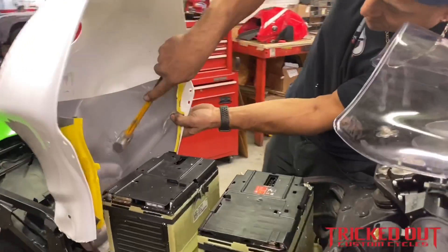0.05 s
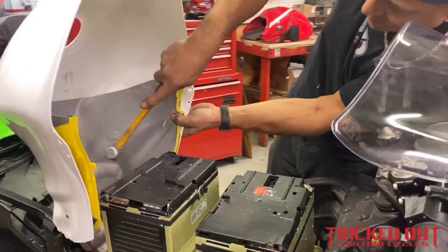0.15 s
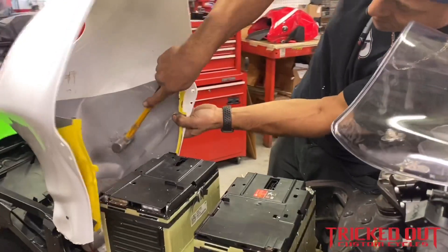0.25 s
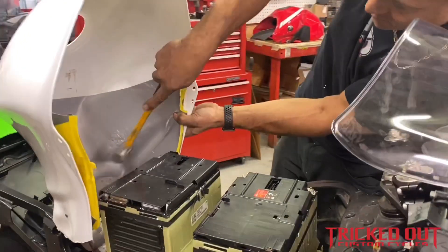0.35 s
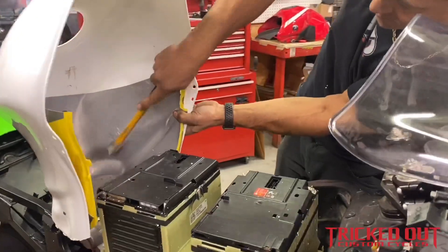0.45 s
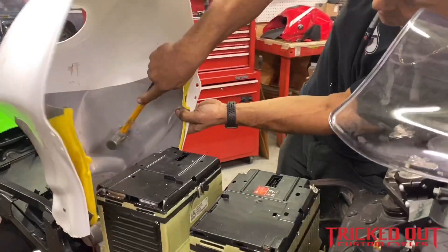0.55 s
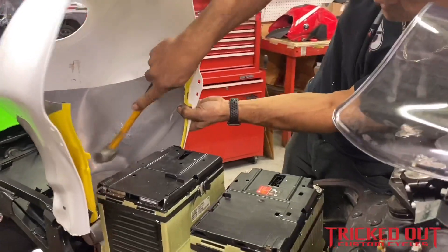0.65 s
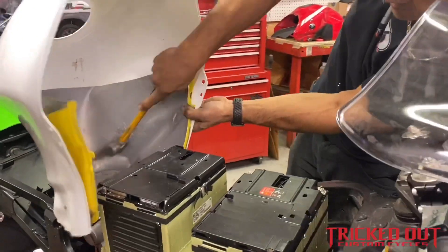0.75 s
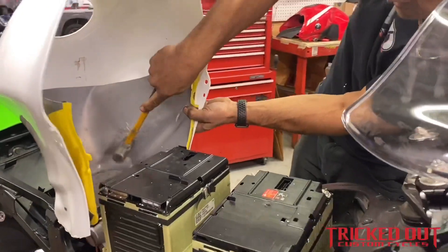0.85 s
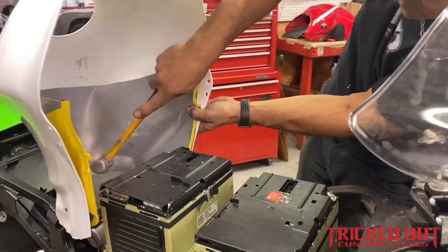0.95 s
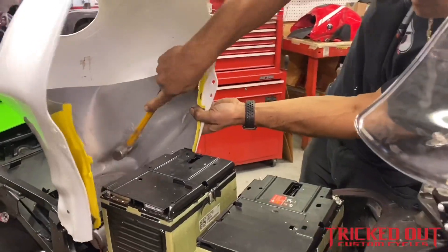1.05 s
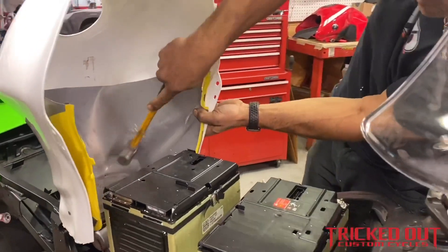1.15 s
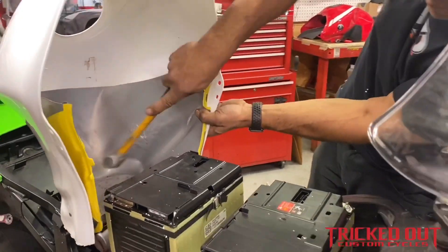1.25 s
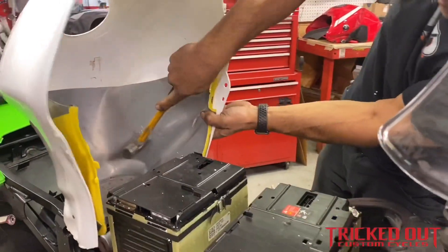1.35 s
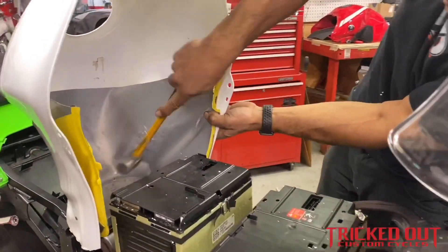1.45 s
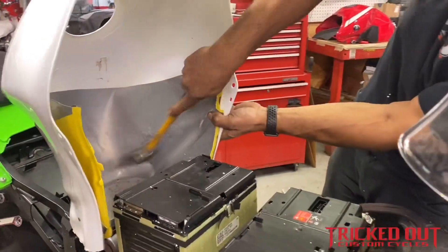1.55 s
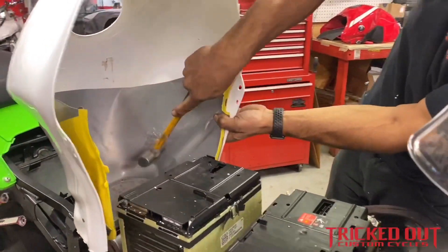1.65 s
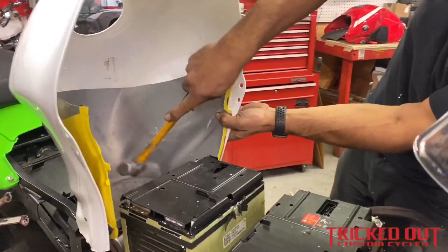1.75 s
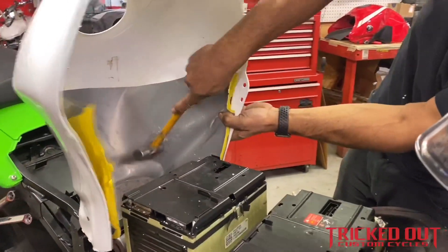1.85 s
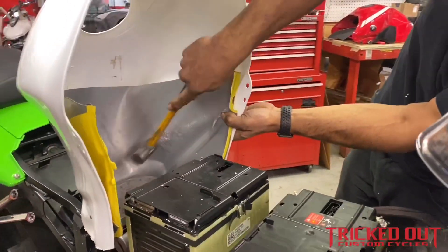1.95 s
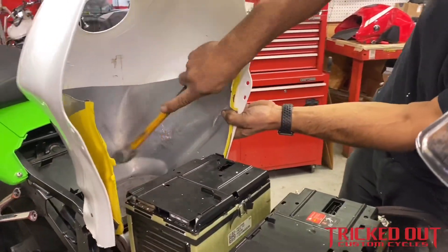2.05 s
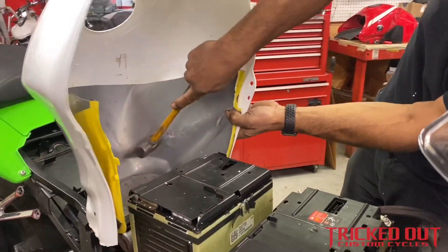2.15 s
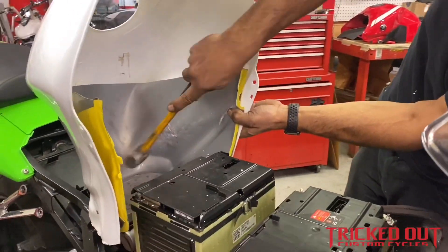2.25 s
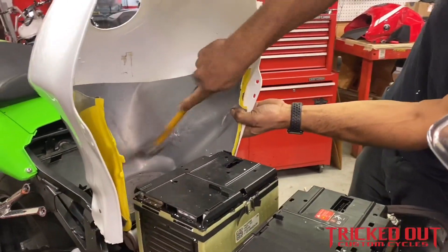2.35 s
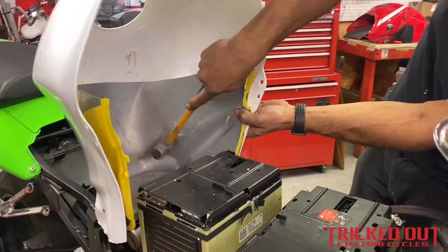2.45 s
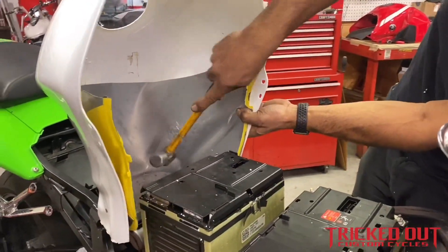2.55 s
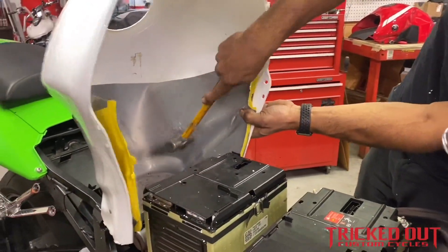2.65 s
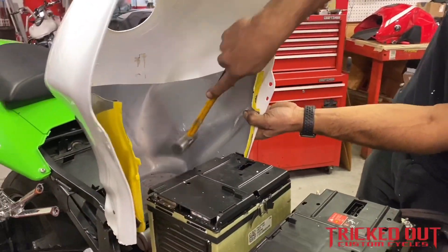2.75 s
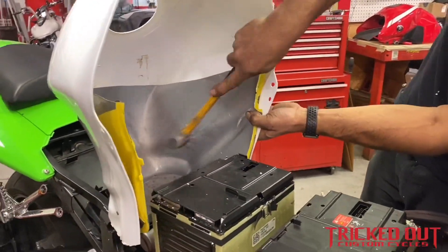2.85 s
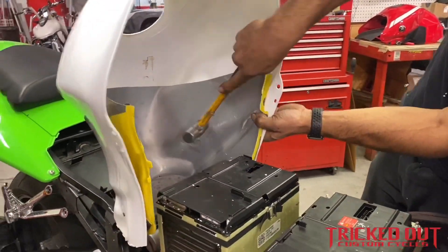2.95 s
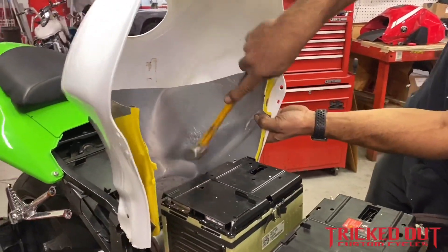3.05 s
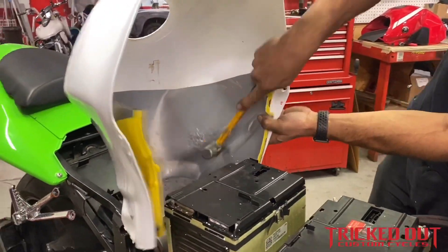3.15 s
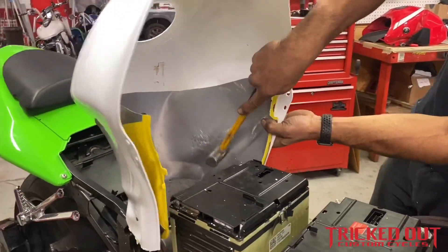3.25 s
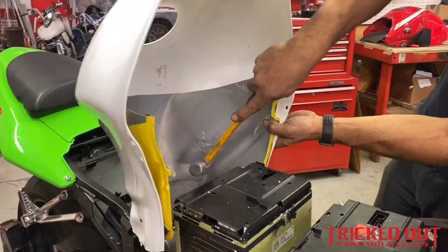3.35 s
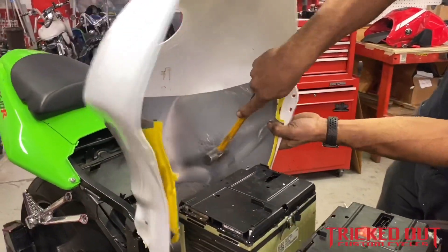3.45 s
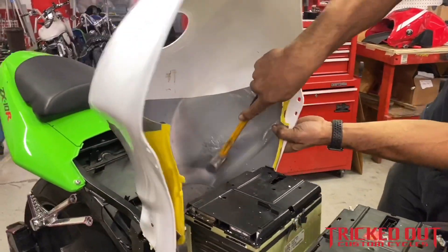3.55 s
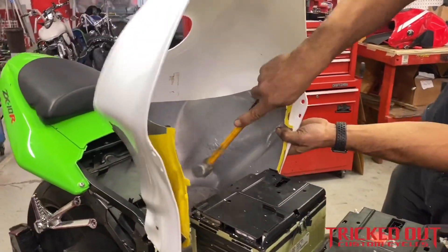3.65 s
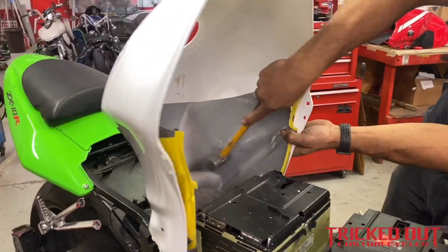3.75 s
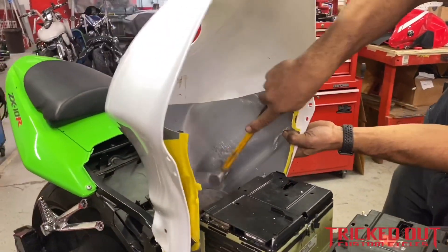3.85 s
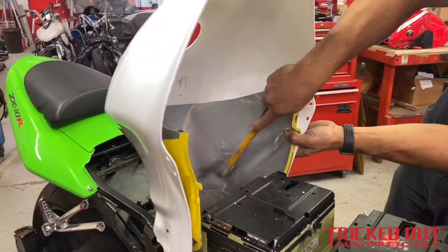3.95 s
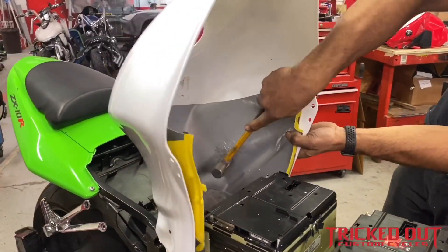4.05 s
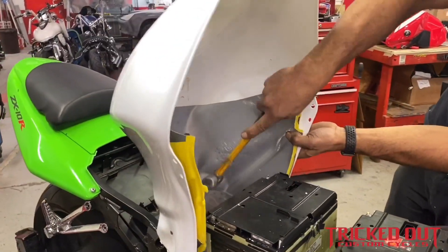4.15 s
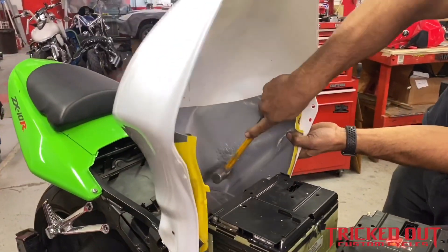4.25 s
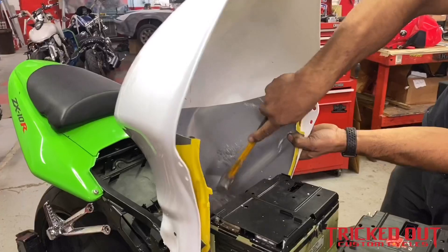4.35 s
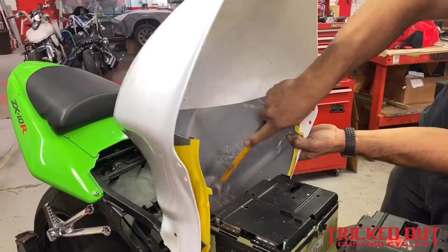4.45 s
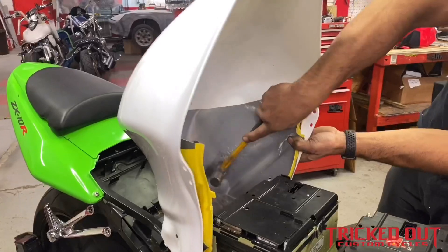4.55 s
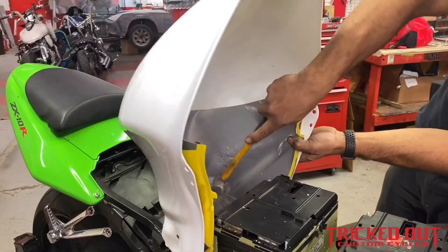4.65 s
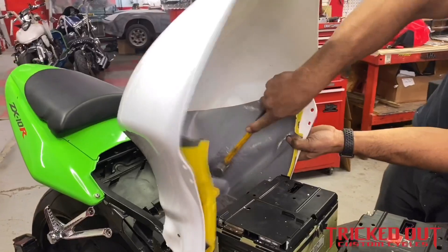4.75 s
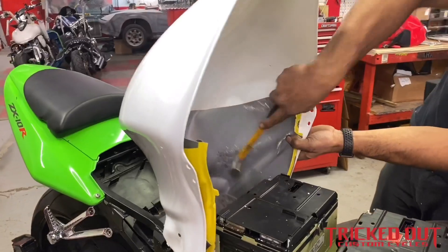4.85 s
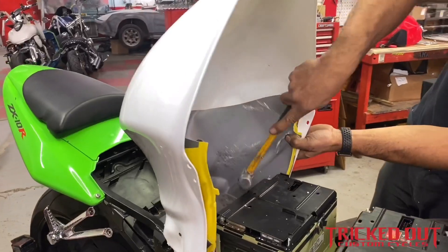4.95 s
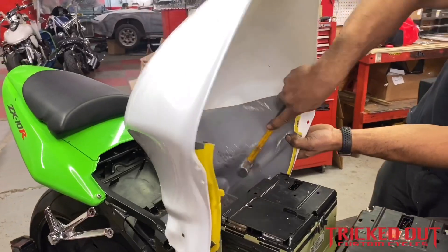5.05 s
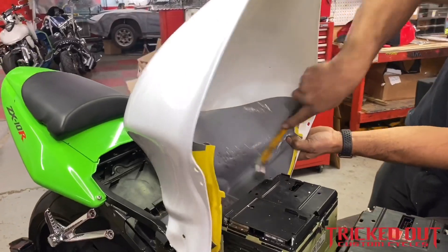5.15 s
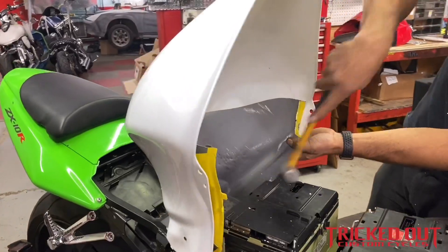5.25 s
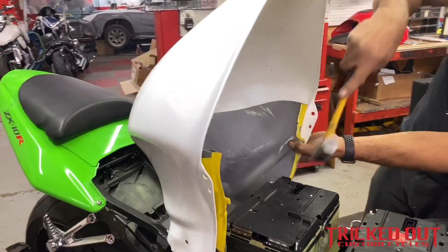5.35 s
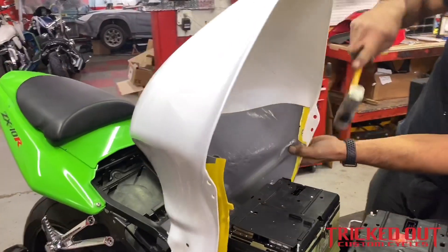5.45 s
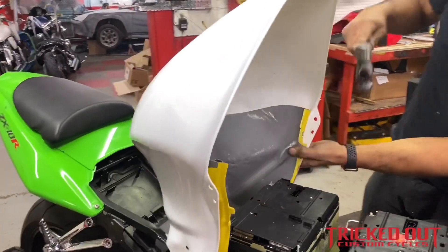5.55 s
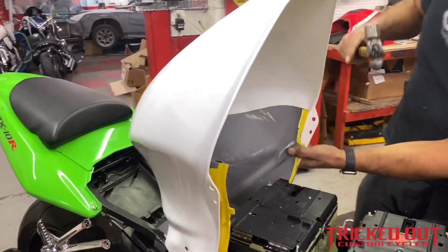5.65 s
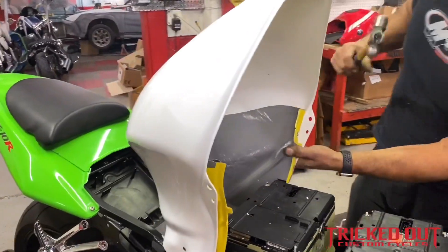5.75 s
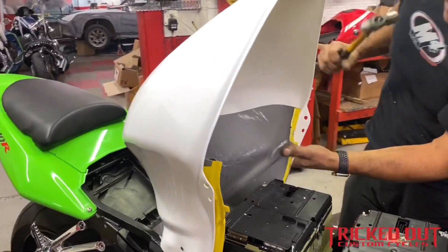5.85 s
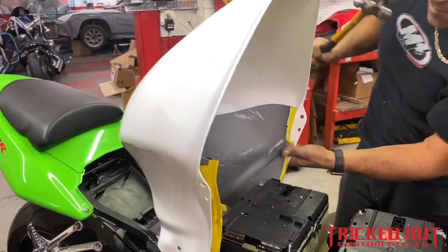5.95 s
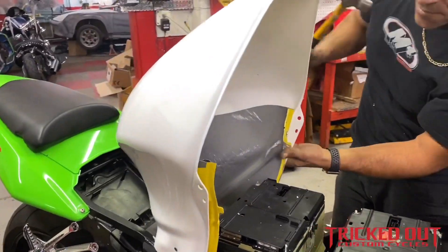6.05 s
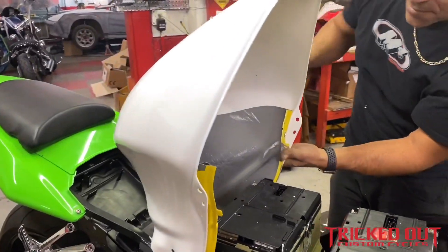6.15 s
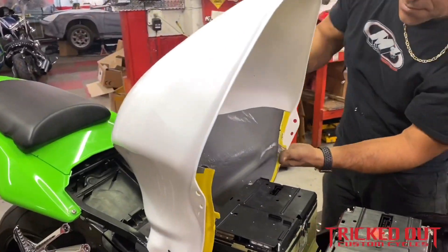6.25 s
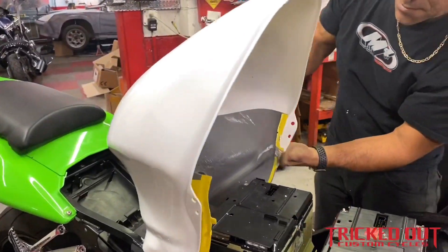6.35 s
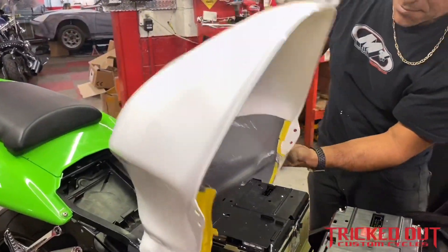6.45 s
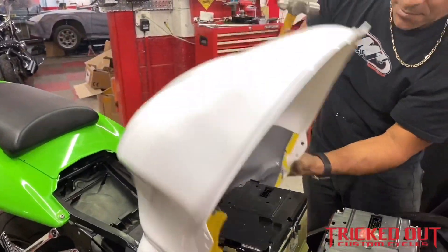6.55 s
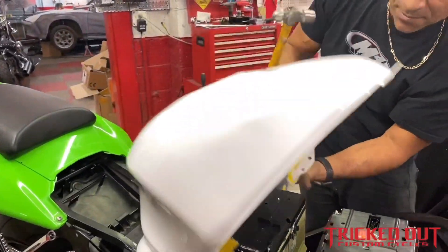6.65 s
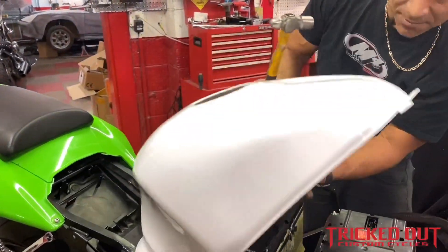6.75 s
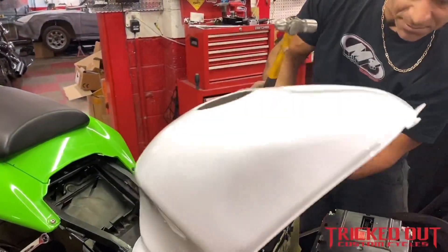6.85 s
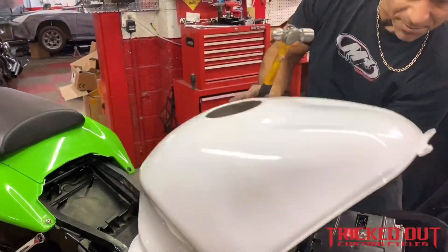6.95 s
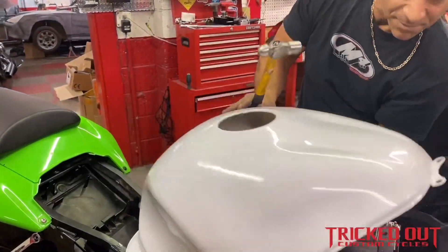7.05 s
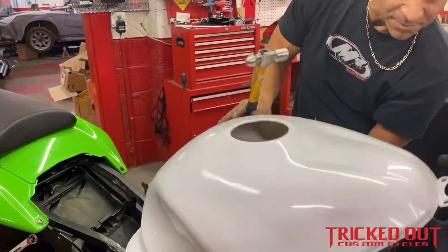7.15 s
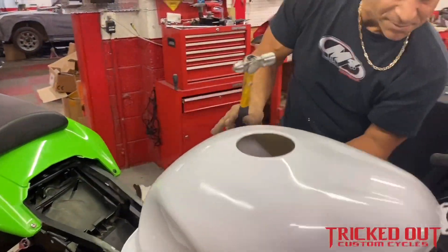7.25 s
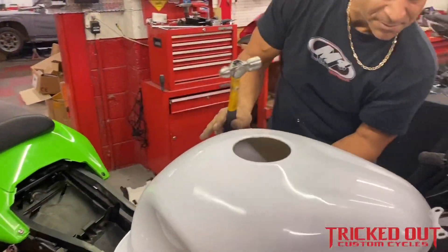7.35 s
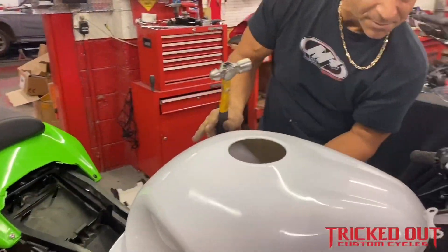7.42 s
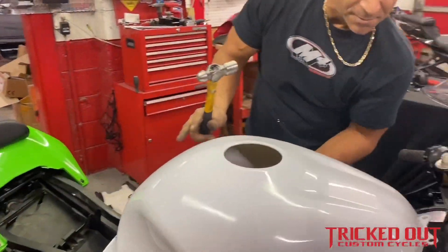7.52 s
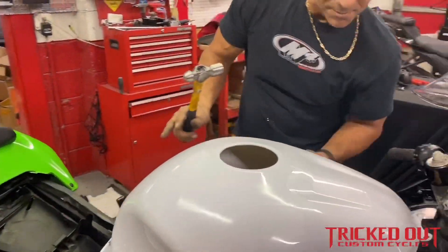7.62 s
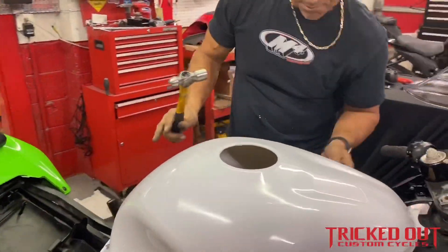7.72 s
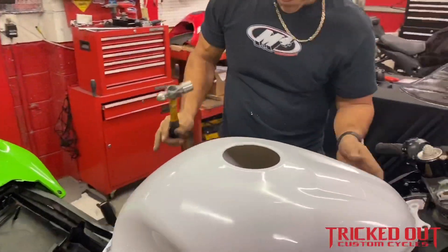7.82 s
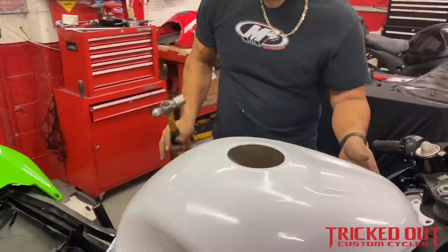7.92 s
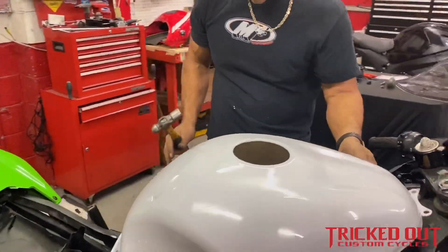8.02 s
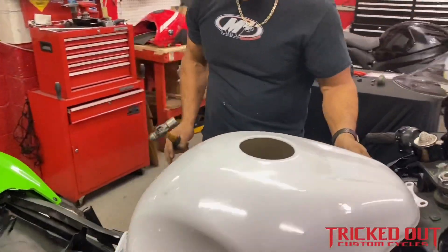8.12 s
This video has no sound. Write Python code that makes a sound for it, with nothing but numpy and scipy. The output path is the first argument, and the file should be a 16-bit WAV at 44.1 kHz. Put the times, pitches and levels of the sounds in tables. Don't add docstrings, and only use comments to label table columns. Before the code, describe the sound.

Close stereo in a reverberant workshop: a small steel hammer strikes the inside of a hand-held metal tank shell, nearly four hard clanks a second, each short and damped with a bright tick and room ring. A couple of blows add a low thud. After five seconds the beating stops, the echo dies, and soft scuffs and padded knocks follow as the shell is turned and set down.

```python
import sys
import numpy as np
from scipy import signal
from scipy.fft import rfft, irfft, next_fast_len
from scipy.io import wavfile
from scipy.ndimage import uniform_filter1d

SR = 44100
rng = np.random.default_rng(int(sys.argv[2]) if len(sys.argv) > 2 else 0)


def materialize(psi):
    bounded = np.clip(np.atleast_2d(psi).T, -1, 1)
    quanta = np.round(bounded * 32767).astype(np.int16)
    wavfile.write(sys.argv[1], SR, quanta)


def linear_from_db(decibels):
    return 10 ** (np.asarray(decibels, float) / 20)


N = 360728

# t/s, wall ring/dB, lower wall mode f/Hz, upper wall mode f/Hz, jolt into the frame/dB
HAMMER_BLOWS = [(0.159, -4.5, 600, 1442, -37.5), (0.432, -0.5, 621, 910, -32.5),
                (0.703, -7.5, 858, 1002, -46), (0.982, -10.5, 802, 1037, -47.5),
                (1.251, -9, 770, 978, -9.5), (1.52, -5.5, 773, 1080, -5), (1.79, -9.5, 813, 1070, -22),
                (2.052, -4, 851, 1070, -41), (2.326, -5, 839, 1015, -37.5), (2.581, -9, 608, 988, -39),
                (2.846, -12, 640, 1135, -18.5), (3.111, -7, 602, 1448, -16), (3.386, -12, 609, 1372, -26.5),
                (3.656, -8.5, 640, 1002, -41), (3.925, -11.5, 644, 1343, -34),
                (4.175, -7, 639, 1400, -35.5), (4.444, -9, 795, 1111, -29), (4.698, -6, 820, 1072, -39),
                (4.977, -13, 600, 1132, -51.5)]
# f/Hz, level/dB
WALL_COLOUR = [(90, -8), (200, -8.5), (330, -5), (460, -8.5), (600, -1), (1000, -5), (1500, -4.5),
               (2500, -8), (3200, -11), (4000, -12.5), (7000, -18), (11000, -19), (15500, -16),
               (17000, -50)]
# f/Hz, likeness/1
SIDES_ALIKE = [(60, 1), (200, .93), (400, 0.6), (900, 0.42), (1800, 0.15), (3000, 0.51), (5500, 0.28)]
LAG_S = .0012


def read(points, hz):
    f, value = np.transpose(points)
    return np.interp(np.log(hz + 1), np.log(f + 1), value)


def evened(x):
    return x / np.sqrt(np.mean(x ** 2) + 1e-20)


def add(mix, s, sound):
    at = round(s * SR)
    sound = sound[:, max(-at, 0):]
    part = mix[:, max(at, 0):][:, :sound.shape[1]]
    part += sound[:, :part.shape[1]]


def pair(z, same):
    left, same = z[0] + 1j * z[1], np.clip(same, 0, 1)
    other = z[2] + 1j * z[3]
    return np.array([left, same * left + np.sqrt(1 - same ** 2) * other])


def hiss(colour, alike, patchy_db):
    frames, hz = N // 256 + 5, np.fft.rfftfreq(1024, 1 / SR)
    z = rng.standard_normal((frames, 513, 5)).T
    patches = evened(uniform_filter1d(uniform_filter1d(z[4], 8, 0), 12, 1))
    gain = linear_from_db(read(colour, hz)[:, None] + patchy_db * patches)
    z = pair(z, read(alike, hz)[:, None]) * gain
    return evened(signal.istft(z, nperseg=1024, noverlap=768)[1][:, :N])


def ring(hz, t60, rise, t):
    return np.exp(2j * np.pi * hz * t) * linear_from_db(-60 * t / t60) * (1 - np.exp(-t / rise))


def cluster(hz, t60, rise, t):
    out = 0
    for k, gain in ((0, 1), (-1, .45), (1, .45)):
        a = rng.standard_normal(4)
        phase = np.exp(.3j * a[:2, None] + 3j * k * a[2])
        out = out + gain * phase * ring(hz * (1 + 0.048 * k + .008 * a[3] * k), t60, rise, t)
    return out.imag


def bite(s):
    # t/s, bite/dB
    landing = [(.43, -6.5), (.7, -12.5), (2.05, -9), (2.33, -10.5), (2.85, -3), (3.4, -4.5), (3.93, -7.5),
               (4.3, -7), (4.98, -6)]
    return np.interp(s, *np.transpose(landing))


def aimed(s):
    # t/s, extra left over right/dB
    bearing = [(0, -2.5), (.55, -1.36), (.75, -0.5), (1.8, -1), (2.6, -3), (5.2, -3.5), (8.2, -2.5)]
    return linear_from_db(np.array([[.5], [-.5]]) * np.interp(s, *np.transpose(bearing)))


def hardness(hz, bright_db):
    return linear_from_db((bright_db + 11.5) * np.clip(np.log2(hz / 1100 + .01), 0, 1.3))


def burst(bright_db, dull_hz):
    hz = np.fft.rfftfreq(1024, 1 / SR)
    colour = linear_from_db(read(WALL_COLOUR, hz)) * hardness(hz, bright_db)
    colour *= hz ** 3 / (hz ** 3 + 57.0 ** 3) / (1 + (hz / dull_hz) ** 2)
    pulse = np.roll(irfft(colour), 512) * np.hanning(1024)
    return pulse / np.linalg.norm(pulse)


def air():
    # f/Hz, level/dB
    machines = [(75.4, -81), (409.1, -98), (479.1, -88.5), (651.4, -101.5), (1044, -99)]
    # f/Hz, level/dB per Hz
    air_colour = [(15, -33), (25, -0.5), (73, 4), (200, -5.5), (368, -14.5), (800, -16), (1300, -21.5),
                  (2360, -31.5), (6000, -29), (10000, -30.5), (14800, -28.5), (15500, -52.5)]
    # f/Hz, likeness/1
    air_alike = [(60, 1), (240, 0.22), (950, 0.12), (3770, 0.11), (15000, 0.14)]
    t = np.arange(N) / SR
    out = linear_from_db(-70.5) * hiss(air_colour, air_alike, patchy_db=.7)
    for hz, db in machines:
        waver = linear_from_db(1.9 * evened(uniform_filter1d(rng.standard_normal(N), 6000)))
        out = out + linear_from_db(db + 3.5) * waver * np.sin(2 * np.pi * (hz * t + rng.random()))
    return out


def shop(x):
    # t/s, level/dB
    echoes = [(0.017, 5.5), (.036, 7), (.052, 3.5), (.075, 4)]
    # f/Hz, t60/s
    shop_t60 = [(60, 1), (200, 1), (500, 0.7), (1200, 0.79), (3000, 0.99), (8000, 0.61), (16000, 0.32)]
    t, out = np.arange(x.shape[1]) / SR, 0
    for k in range(3):
        taps = np.zeros((2, SR))
        at = np.arange(300, SR - 12, 12) + rng.integers(0, 12, (2, (SR - 301) // 12))
        np.put_along_axis(taps, at, rng.choice([-1., 1.], at.shape), 1)
        taps *= linear_from_db(sum(db * np.exp(-((t[:SR] - s) / 0.005) ** 2) for s, db in echoes))
        hz, lag, z = signal.stft(taps, SR, nperseg=256)
        same = np.clip(read(SIDES_ALIKE, hz) - .05, 0, 1)[:, None]
        z[1] = same * z[0] + np.sqrt(1 - same ** 2) * z[1]
        fall_db = -60 * lag / read(shop_t60, hz)[:, None]
        decay = linear_from_db(1.7 * fall_db) + .45 * linear_from_db(.95 * fall_db - 70 * lag ** 2)
        tail = signal.istft(z * decay, SR, nperseg=256)[1]
        turn = np.sqrt(2 / 3) * np.cos(np.pi * (1.3 * t + k / 3))
        out = out + signal.fftconvolve(x * turn, tail / np.linalg.norm(tail[0]), axes=1)
    return out[:, :x.shape[1]]


def scuffs():
    # t/s, length/s, first level/dB, last level/dB
    rubs = [
        (6.2, 0.49, -70.5, -75),
        (6.747, 0.656, -72.5, -65),
        (7.82, .5, -65.5, -76),
    ]
    # f/Hz, level/dB per Hz
    scuff_colour = [(60, -18), (150, 2.5), (300, 8), (800, -4), (1500, -15), (3500, -20), (8000, -55.5)]
    rise_s, fade_s = .1, 0.054
    t, level = np.arange(N) / SR, 0
    lumps = evened(uniform_filter1d(uniform_filter1d(rng.standard_normal(N), 500), 500))
    for s, length, first_db, last_db in rubs:
        held = np.clip((t - s) / rise_s, 0, 1) * np.exp(-np.maximum(t - s - length, 0) / fade_s)
        drift_db = (last_db - first_db) * np.clip((t - s) / length, 0, 1)
        level = level + held * linear_from_db(first_db + drift_db)
    return level * linear_from_db(1.2 * lumps + 3.0) * hiss(scuff_colour, SIDES_ALIKE, patchy_db=4.5)


def bumps():
    # t/s, level/dB, lower f/Hz, upper f/Hz, slide into contact/s
    soft_knocks = [(6.284, -56.5, 560, 785, 0.0045), (6.339, -57, 512, 840, .008),
                   (6.486, -46, 1182, 895, .005), (6.761, -60.5, 800, 1135, .003),
                   (7.007, -61, 313, 808, .002), (7.253, -41, 441.4, 947, .003),
                   (7.398, -42.5, 1172, 1650, 0.0074), (7.833, -58, 297.5, 702, 0.012),
                   (7.862, -43, 485, 680, .006), (7.956, -52.5, 285, 785, 0.0052),
                   (8.068, -54.5, 284, 905, 0.0024)]
    t, out = np.arange(4000) / SR, np.zeros((2, N))
    no_thump = signal.butter(2, 110, "high", fs=SR, output="sos")
    for s, db, low_hz, high_hz, slide_s in soft_knocks:
        modes = cluster(low_hz, 0.031, 0.0014, t) + cluster(high_hz, 0.026, 0.0027, t)
        wall = np.zeros(len(t))
        wall[512:] = 0.04 * linear_from_db(8.5) * modes[0, :-512]
        wall[:1024] += burst(bright_db=-16.5, dull_hz=4740)
        wall = signal.sosfilt(no_thump, wall)
        grit = pair(rng.standard_normal((4, len(t))), 0.76).real
        grit *= (t / slide_s) ** 2 * np.exp(-t / slide_s)
        knock = signal.fftconvolve(grit, wall[None], axes=1)
        start = s - 512 / SR - 1.2 * slide_s
        add(out, start, linear_from_db(db) * aimed(s) * knock / abs(knock.mean(0)).max())
    return out


def frame():
    # t/s, level/dB
    grip = [(.43, -24.5), (1.52, -26.5), (1.79, -35), (2.05, -20), (2.33, -20), (2.58, -30.5), (3.11, -22),
            (3.9, -28), (4.44, -24), (4.98, -27.5)]
    rebound_s, rebound_db = .0364, -10.5
    t, out = np.arange(SR // 2) / SR, np.zeros((2, N))
    fade = np.minimum(1, (t[-1] - t) / 0.083)
    for s, *_, thud_db in HAMMER_BLOWS:
        flank_db = -15.5 + 0.25 * thud_db
        hum_db = np.interp(s, *np.transpose(grip))
        sag_turns = 55 * t + 1.7 * (1 - np.exp(-t / 0.0057))
        thud = np.sin(2 * np.pi * sag_turns) * linear_from_db(-60 * t / 0.11) * (1 - np.exp(-t / .007)) ** 2
        thud += linear_from_db(rebound_db) * np.interp(t - rebound_s, t, thud, left=0)
        thud += (0.2 * ring(44, 0.17, 0.023, t) - 0.031 * ring(40, 0.29, 0.033, t)).imag
        flank = ring(235, 0.36, 0.01, t) + 3.3 * ring(208, 0.12, .012, t)
        hum = ring(291, 0.59, .012, t) * (1 + 0.61 * np.cos(2 * np.pi * (7 * t + rng.random())))
        hum += 0.26 * ring(325, 0.73, 0.0076, t) + .5 * ring(345, 0.65, .01, t)
        hum += 0.62 * ring(112, 0.63, .02, t)
        sound = linear_from_db(thud_db + 9.0) * thud
        sound += linear_from_db(flank_db - 4.0) * flank.imag + linear_from_db(hum_db - 4.0) * hum.imag
        add(out, s + LAG_S, sound * linear_from_db([[.6], [-.6]]) * fade)
    return out


def clumps():
    treble_hz = [1540, 1830, 2224, 2580, 2730]
    t, out = np.arange(3000) / SR, np.zeros((2, N))
    for s, ring_db, *_ in HAMMER_BLOWS:
        first_hz = treble_hz[rng.integers(len(treble_hz))]
        top_hz = 4230 if ring_db > -4 else 3143
        second_hz = top_hz * (1 + .03 * rng.standard_normal())
        rings = linear_from_db(-6) * cluster(first_hz, 0.028, .001, t)
        rings += linear_from_db(-10) * cluster(second_hz, 0.032, .0007, t)
        tick = np.diff(rng.standard_normal(len(t) + 2), 2)
        tick *= np.exp(-t / 0.00089) * (1 - np.exp(-t / .0003))
        add(out, s + LAG_S, linear_from_db(bite(s) + 1.0) * aimed(s) * (rings + 0.11 * tick))
    return out


def shell(rows):
    # f/Hz, t60/s
    wall_t60 = [(100, 0.21), (400, 0.0068), (1000, 0.019), (3000, 0.11), (8000, 0.045), (16000, 0.0056)]
    # f/Hz, rise/s
    wall_rise = [(100, .03), (330, .012), (600, 0.0011), (2000, 0.0036), (8000, 0.0004)]
    t, near, sent = np.arange(7000) / SR, np.zeros((2, N)), np.zeros((2, N))
    long_t = np.arange(SR // 2) / SR
    hz = 130 + 16800 * ((np.arange(600) + rng.random(600)) / 600) ** 1.6
    t60 = read(wall_t60, hz)
    waves = ring(hz[:, None], t60[:, None], read(wall_rise, hz)[:, None], t)
    share = linear_from_db(read(WALL_COLOUR, hz)) * hz ** 0.18 / np.sqrt(t60)
    for s, ring_db, low_hz, high_hz, _ in rows:
        bright_db = -16 + 0.32 * bite(s)
        spot = pair(rng.standard_normal((4, len(hz))), read(SIDES_ALIKE, hz))
        field = ((spot * share * hardness(hz, bright_db)) @ waves).real
        field *= 0.15 * linear_from_db(-2.78 + 0.26 * bite(s)) / np.std(field)
        leads = linear_from_db(ring_db) * cluster(low_hz, 0.11, 0.004, t)
        leads += linear_from_db(-11 + 0.15 * ring_db) * cluster(high_hz, 0.13, 0.0036, t)
        for step in (.86, 1, 1.17):
            leads += linear_from_db(-6 + 0.9 * bite(s)) * cluster(1092.3 * step, 0.065, 0.0017, t)
        linger = (ring(low_hz, .5, .02, long_t) + ring(low_hz + 31, .5, .02, long_t)).imag
        add(near, s, linear_from_db(-3.0) * aimed(s) * (field + leads))
        add(near, s, linear_from_db(ring_db - 19) * aimed(s) * linger)
        add(sent, s, linear_from_db(-13) * aimed(s) * leads * linear_from_db(-60 * t / .06))
        sent_db = -1.74 + 0.21 * ring_db + 15.0
        add(sent, s - .008, linear_from_db(sent_db) * aimed(s) * burst(bright_db, dull_hz=30000))
    return signal.sosfilt(signal.butter(3, 130, "high", fs=SR, output="sos"), near), sent


def scene():
    # level/dB, wall ring/dB, lower f/Hz, upper f/Hz
    earlier_blow = (5.3, .5, 340, 900)
    hits, sent = shell(HAMMER_BLOWS)
    knocks = bumps()
    before = linear_from_db(earlier_blow[0] - 5) * shell([(.02, *earlier_blow[1:], 0)])[1][:, :SR]
    top = clumps()
    echoing = shop(sent + linear_from_db(-16.5) * top + linear_from_db(-3) * knocks)
    out = hits + top + knocks + frame() + echoing + scuffs() + air()
    add(out, -.125, shop(before))
    return out


def top_cut(x):
    return signal.sosfilt(signal.butter(12, 16600, fs=SR, output="sos"), x)


def record(dry):
    # f/Hz, left over right/dB
    tilt_left = [(400, 1.4), (900, 4.5), (1800, 4), (3500, 4.5), (5300, 9.5), (8500, 0)]
    # f/Hz, share of right taken from left/1
    merging = [(4500, .05), (6500, .5), (8500, .68), (10000, 0.88), (15500, 1)]
    size = next_fast_len(N + 4096)
    left, right = rfft(1.081 * np.tanh(dry / 1.082), size)
    hz = np.fft.rfftfreq(size, 1 / SR)
    merged = np.clip(read(merging, hz), 0, 1) * (hz > 3000)
    lead = np.exp(2j * np.pi * np.maximum(hz - 6450, 0) / 3760)
    right = merged * lead * left + np.sqrt(1 - merged ** 2) * right
    tilt = linear_from_db(.5 * read(tilt_left, hz))
    band_edges = np.sqrt(1 + (38 / (hz + 1)) ** 4) * np.sqrt(1 + (hz / 16200) ** 70)
    ports = irfft(np.array([left * tilt, right / tilt]) / band_edges, size)[:, :N]
    return top_cut(np.clip(ports, -1, 1))


dry = scene()
out = record(dry)
materialize(out)
```